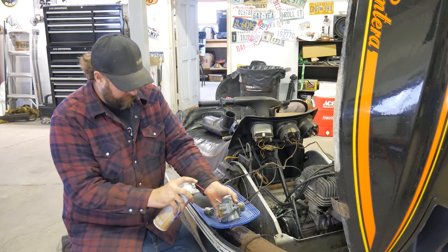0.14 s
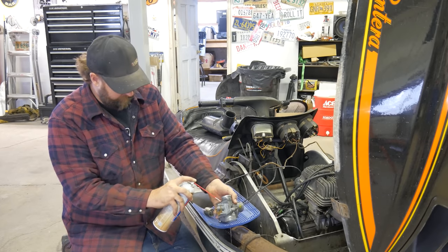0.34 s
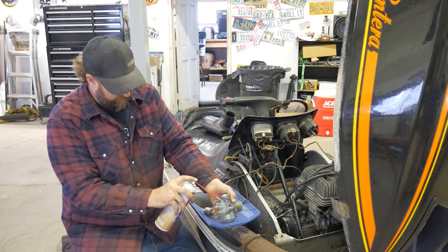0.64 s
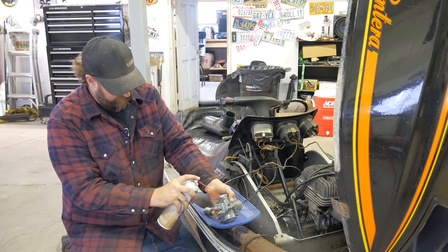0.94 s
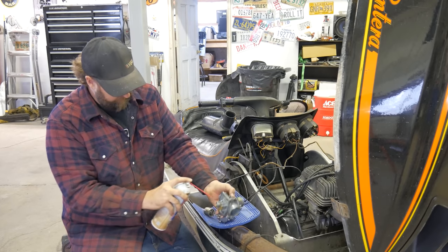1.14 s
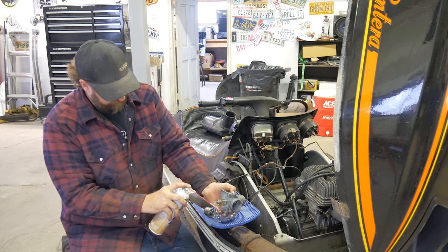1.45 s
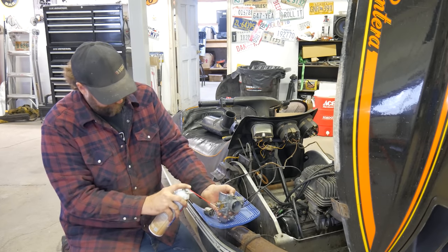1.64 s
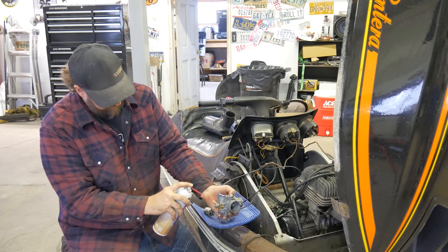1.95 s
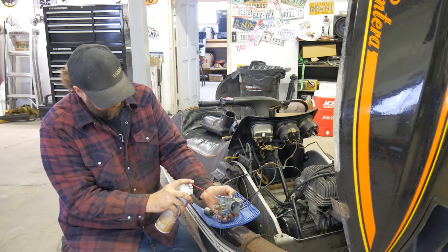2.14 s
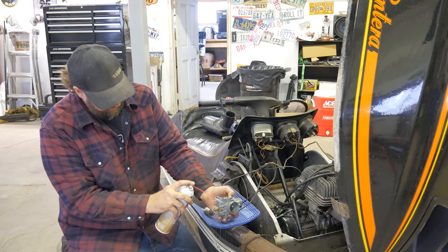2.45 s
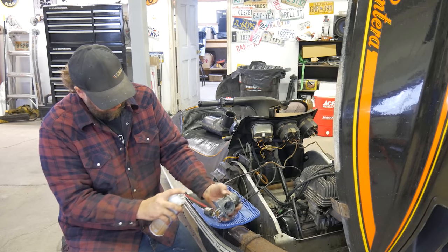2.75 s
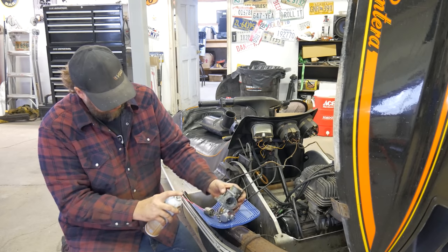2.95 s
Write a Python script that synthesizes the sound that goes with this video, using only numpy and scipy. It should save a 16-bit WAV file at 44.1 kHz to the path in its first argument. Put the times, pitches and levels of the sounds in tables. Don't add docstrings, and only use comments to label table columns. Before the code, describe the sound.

Spray can hisses in four uneven bursts against hollow metal, echoing lightly through a workshop

```python
import sys
import numpy as np
from scipy import signal
from scipy.fft import rfft, irfft, next_fast_len
from scipy.io import wavfile

SR = 44100
rng = np.random.default_rng(int(sys.argv[2]) if len(sys.argv) > 2 else 0)


def gain_from_db(level_db):
    decades = np.asarray(level_db, float) / 20
    return 10 ** decades


def master(y):
    cut = np.clip(np.atleast_2d(y).T, -1, 1)
    pcm = np.round(cut * 32767)
    wavfile.write(sys.argv[1], SR, pcm.astype(np.int16))


N = 136710
LEAD_S = 0.6


def rms_one(x):
    return x / np.sqrt(np.mean(x ** 2) + 1e-20)


def clock():
    return np.arange(-int(LEAD_S * SR), N) / SR


def at_hz(points, hz):
    table_hz, value = np.transpose(points)
    return np.interp(np.log(hz), np.log(table_hz), value)


def drift(rate_hz):
    size = len(clock())
    step = 16
    r = np.exp(-2 * np.pi * rate_hz * step / SR)
    noise = rng.standard_normal(size // step + 3002)
    slow = signal.lfilter([1], [1, -2 * r, r * r], noise)[3000:]
    return np.interp(np.arange(size) / step, np.arange(len(slow)), rms_one(slow))


def bands(low_hz, high_hz):
    edges = 1000 * 2 ** (np.arange(-16, 14) / 3)
    return [(np.sqrt(a * b), signal.butter(2, [a, b], "band", fs=SR, output="sos"))
            for a, b in zip(edges, edges[1:]) if b > low_hz and a < high_hz]


def hiss(spectrum, patchy_db, rate_hz):
    white = rng.standard_normal((2, len(clock())))
    shared = drift(rate_hz)
    out = 0
    for k, (hz, sos) in enumerate(bands(spectrum[0][0], spectrum[-1][0])):
        flicker_db = patchy_db * (0.26 * shared + drift(rate_hz))
        out = out + gain_from_db(at_hz(spectrum, hz) + flicker_db) * signal.sosfilt(sos, white[k % 2])
    return rms_one(out)


def resonate(x, hz, width_hz):
    r = np.exp(-np.pi * width_hz / SR)
    return signal.lfilter([1, 0, -1], [1, -2 * r * np.cos(2 * np.pi * hz / SR), r * r], x)


def hollow(peaks, flicker_db, rate_hz):
    out = 0
    for hz, width_hz, db in peaks:
        air = resonate(rng.standard_normal(len(clock())), hz, width_hz)
        air = resonate(air, hz, 3 * width_hz)
        out = out + gain_from_db(db + flicker_db * drift(rate_hz)) * rms_one(air) * np.sqrt(width_hz)
    return rms_one(out)


# (start_s, length_s, level_db, opening_s, closing_s)
BUTTON_PRESSES = [
    (-.5, .36, -36, .04, 0.021),
    (0.137, 0.8767, -38, 0.033, 0.042),
    (1.392, 0.6335, -36.5, 0.073, 0.048),
    (2.204, 0.16, -38, 0.041, 0.025),
    (2.473, 0.14, -36, 0.026, 0.045),
]


def flow(lag_s, crack_db):
    t, out = clock(), 0
    crack = gain_from_db(crack_db)
    for start, length, db, opening, closing in BUTTON_PRESSES:
        rise = np.clip((t - start - lag_s) / opening, 0, 1)
        shut = np.clip((start + length + closing - t) / closing, 0, 1)
        out = out + gain_from_db(db) * (rise > 0) * (crack + (1 - crack) * rise) * shut ** 1.3
    return out


# (pitch_hz, level_db per Hz)
JET_HISS = [(900, -42), (1500, -6), (2300, -3), (3300, -3.5), (5000, -1.5), (8000, -1.5), (13800, -3),
            (16000, -17)]
# (pitch_hz, width_hz, level_db)
BORE_RINGING = [(2780, 196, 7.5), (3930, 370, -1.5), (4390, 360, -4), (5840, 240, 2.5), (6520, 150, 0.5),
                (6700, 310, -17), (8580, 400, -8), (9170, 500, -4), (9780, 420, -8), (10200, 440, -8),
                (12600, 760, -3), (14000, 780, -4.5)]


def jet():
    sound = gain_from_db(-0.5) * hiss(JET_HISS, patchy_db=1.06, rate_hz=9.2)
    sound = sound + gain_from_db(-7) * hollow(BORE_RINGING, flicker_db=4.5, rate_hz=4.5)
    return flow(lag_s=0, crack_db=-15.5) * sound


# (time_s, into_throat_db, into_bowl_db)
STRAW_AIM = [(0.15, -1, 4), (.3, -10, -13), (.48, -9, -8), (.54, 0, -10), (.64, -1.5, -16), (.74, 8, -11),
             (.82, -3, -2), (1.0, 2, -14), (1.45, 0, 1.5), (1.7, 0.5, -2.5), (1.85, 4, -1.5),
             (2.03, 1.5, -1.5), (2.22, 5, -5), (2.3, 5.5, -8), (2.36, 4.5, 9), (2.5, 6, -2), (2.6, 1, -14)]


def aim():
    time_s, throat_db, bowl_db = np.transpose(STRAW_AIM)
    return np.interp(clock(), time_s, throat_db), np.interp(clock(), time_s, bowl_db)


# (pitch_hz, width_hz, level_db)
THROAT_WHISTLE = [(3115, 154, 1.5), (3380, 150, -4)]


def throat(aim_db):
    sound = hollow(THROAT_WHISTLE, flicker_db=1.1, rate_hz=19)
    return flow(lag_s=0.0055, crack_db=-3.5) * gain_from_db(-11 + aim_db) * sound


# (pitch_hz, level_db per Hz)
SPLASH_NOISE = [(88, -45), (150, -17.5), (379, -9), (500, 4), (684, -2), (971, 0.5), (1140, -4.5),
                (3000, -4), (3900, -6), (6600, -120)]
# (pitch_hz, width_hz, level_db)
PASSAGE_RINGING = [(775, 120, -3), (974, 61, 3.5), (1355, 84, -0.5), (1806, 44, 0.5), (2057, 72, -4),
                   (2390, 81, -6)]
# (pitch_hz, width_hz, level_db)
BOWL_RINGING = [(486, 26, -3), (5560, 65, -10)]


def splash(bowl_aim_db):
    sound = gain_from_db(-7) * hiss(SPLASH_NOISE, patchy_db=0.73, rate_hz=27)
    sound = sound + gain_from_db(-13) * hollow(PASSAGE_RINGING, flicker_db=2.2, rate_hz=23)
    sound = sound + gain_from_db(-10.5 + bowl_aim_db) * hollow(BOWL_RINGING, flicker_db=2.6, rate_hz=42)
    return flow(lag_s=0.014, crack_db=-10) * sound


def tray_echo(x):
    delay_s = 0.000777 + 0.00011 * drift(1.05)
    sample = np.arange(len(x))
    return gain_from_db(-12) * np.interp(sample - delay_s * SR, sample, x)


def spray():
    throat_db, bowl_db = aim()
    spatter = gain_from_db(1.5 * drift(675) + 0.5 * drift(31))
    direct = spatter * (jet() + throat(throat_db) + splash(bowl_db))
    direct = signal.sosfilt(signal.butter(4, 259, "high", fs=SR, output="sos"), direct)
    return direct + tray_echo(direct)


# (pitch_hz, level_db per Hz)
SHOP_RUMBLE = [(15, -54), (25, -7.5), (249, -6), (354, 1), (961, -2), (1130, -2), (1790, -4.5), (2160, -6),
               (16000, -30.5)]
# (pitch_hz, level_db rms)
MAINS_HUM = [(120, -81), (360, -72.5), (720, -72), (960, -71), (1320, -70)]


def shop():
    sound = gain_from_db(-60) * hiss(SHOP_RUMBLE, patchy_db=1.0, rate_hz=1.3)
    for hz, db in MAINS_HUM:
        sound = sound + gain_from_db(db + drift(1.5)) * np.sqrt(2) * np.sin(2 * np.pi * hz * clock())
    return sound


# (time_s, peak_db, pitch_hz, t60_s, width_hz)
PART_TICKS = [(.113, -52, 10500, 0.068, 1500), (2.176, -47, 11500, .012, 6000),
              (2.780, -49, 4500, 0.047, 1800), (2.783, -48, 7550, 0.038, 2500),
              (2.797, -51, 9640, 0.018, 6000), (2.850, -50, 14000, 0.017, 5000),
              (2.881, -40.5, 11500, 0.0047, 6000), (2.900, -50.5, 6550, .04, 1400),
              (2.901, -53, 9400, .03, 2470), (2.992, -45, 1060, 0.049, 850), (3.001, -48, 1770, 0.077, 300),
              (3.045, -45, 855, 0.018, 686), (3.074, -53, 706, 0.041, 300)]


def ticks():
    out = np.zeros(len(clock()))
    t = np.arange(SR // 8) / SR
    for time_s, db, hz, t60_s, width_hz in PART_TICKS:
        scratch = rng.standard_normal(len(t)) * gain_from_db(-60 * t / t60_s)
        ring = resonate(resonate(scratch, hz, width_hz), hz, width_hz)
        tick = gain_from_db(db) * ring / np.abs(ring).max()
        i = int((time_s + LEAD_S) * SR)
        out[i:i + len(t)] += tick[:len(out) - i]
    return out


# (time_s, length_s, pitch_hz, level_db)
VALVE_CHIRP = (2.4525, .0048, 3080, -32)


def chirp():
    time_s, length_s, hz, db = VALVE_CHIRP
    t = clock() - time_s
    edge_s = 0.0008
    rise = np.clip(t / edge_s, 0, 1)
    fall = np.clip((length_s - t) / edge_s, 0, 1)
    after_ring = 0.3 * np.exp(-np.maximum(t - length_s, 0) / 0.004)
    shape = rise * np.maximum(fall, after_ring)
    return gain_from_db(db + 0.8 * drift(300)) * shape * np.sin(2 * np.pi * hz * t)


# (pitch_hz, t60_s)
HALL_RINGING = [(200, 1.6), (700, 0.94), (2000, 1.14), (4000, 1.06), (7000, 0.78), (11000, 0.53),
                (16000, 0.2)]
# (pitch_hz, level_db)
WALL_COLOUR = [(300, -0.5), (1200, 2), (2400, 3.5), (3300, 0), (4300, 4), (6000, -2), (9000, -3.5),
               (15000, -3.5)]


def garage(x):
    t = np.arange(int(1.5 * SR)) / SR
    white = rng.standard_normal((2, len(t)))
    tail = 0
    for k, (hz, sos) in enumerate(bands(100, 16000)):
        level_db = at_hz(WALL_COLOUR, hz) - 60 * t / at_hz(HALL_RINGING, hz)
        tail = tail + signal.sosfilt(sos, white[k % 2]) * gain_from_db(level_db)
    tail = tail * np.clip(t / 0.0064 - 1, 0, 1)
    near = rng.standard_normal(len(t)) * gain_from_db(-60 * t / 0.055) * (t > 0.001)
    echo = gain_from_db(-13) * tail / np.sqrt(np.sum(tail ** 2))
    echo = echo + gain_from_db(-16) * near / np.sqrt(np.sum(near ** 2))
    return signal.fftconvolve(x, echo)[:len(x)]


# (pitch_hz, level_db under the common sound)
SIDE_LEVEL = [(30, -14.5), (120, -8.5), (380, -19.5), (2400, -21.5), (5000, -21.5), (15000, -17)]


def two_channels(x):
    t = np.arange(SR // 20) / SR
    smear = rng.standard_normal(len(t)) * np.exp(-t / 0.015)
    smear = smear / np.sqrt(np.sum(smear ** 2))
    size = next_fast_len(len(x) + SR // 10)
    gain = gain_from_db(at_hz(SIDE_LEVEL, np.arange(size // 2 + 1) * SR / size + 1))
    side = irfft(rfft(x, size) * rfft(smear, size) * gain, size)[:len(x)]
    swing_db = 6.0 * np.clip(drift(14), -3, 1.0)
    side = side * rms_one(gain_from_db(swing_db))
    self_noise = gain_from_db(-66.5) * rng.standard_normal((2, len(x)))
    return x + side * [[1], [-1]] + self_noise


def scene():
    bench = spray() + ticks() + chirp()
    return two_channels(bench + garage(bench) + shop())[:, -N:]


def band_limit(x):
    return signal.sosfilt(signal.butter(12, 16140, fs=SR, output="sos"), x)


def record(dry):
    low_cut = signal.butter(2, 66.2, "high", fs=SR, output="sos")
    top_cut = signal.ellip(10, 0.5, 70, 15650, fs=SR, output="sos")
    mix = signal.sosfilt(np.vstack([low_cut, top_cut]), dry)
    return band_limit(mix)


dry = scene()
out = record(dry)
master(out)
```